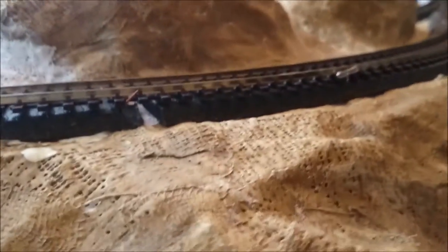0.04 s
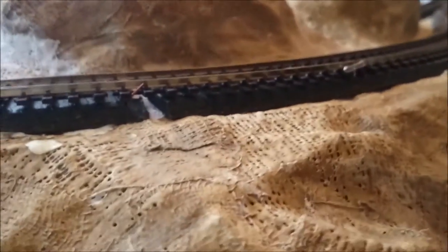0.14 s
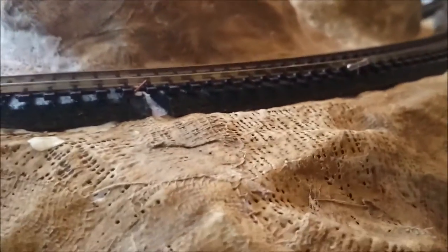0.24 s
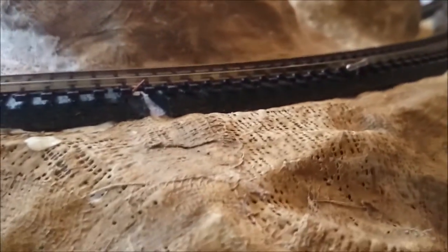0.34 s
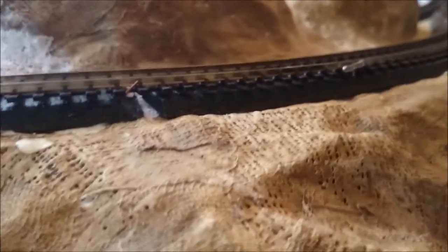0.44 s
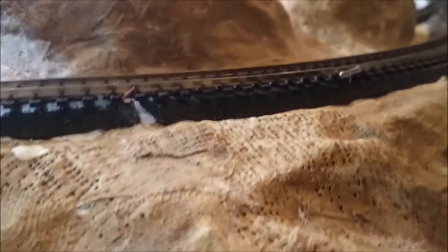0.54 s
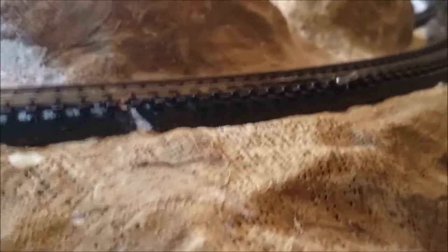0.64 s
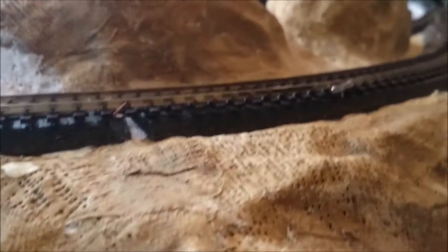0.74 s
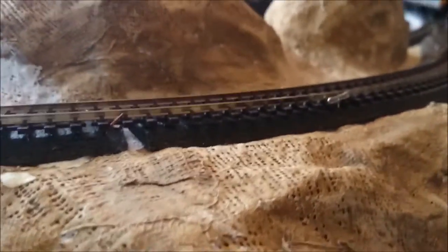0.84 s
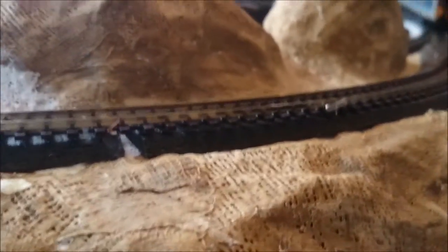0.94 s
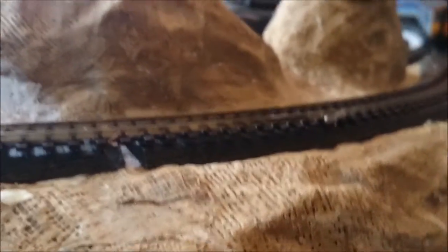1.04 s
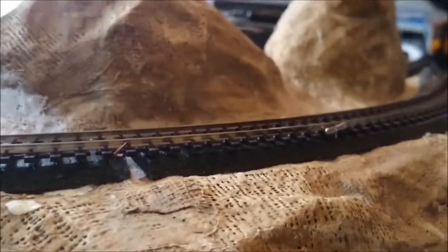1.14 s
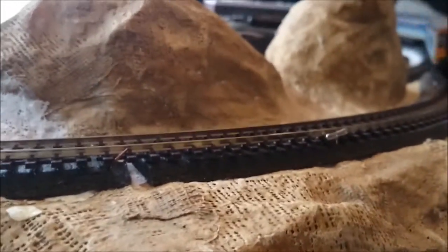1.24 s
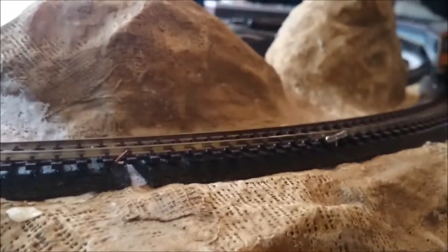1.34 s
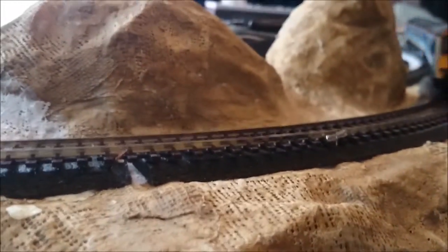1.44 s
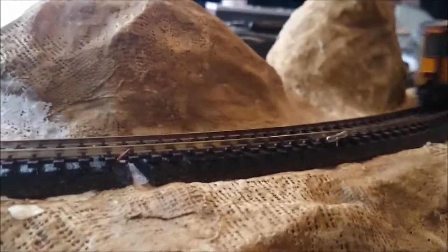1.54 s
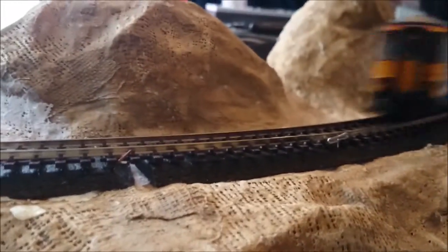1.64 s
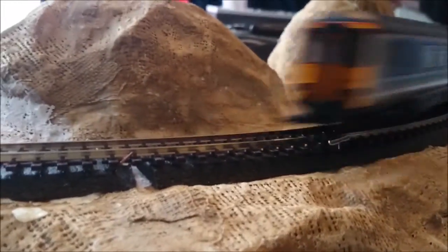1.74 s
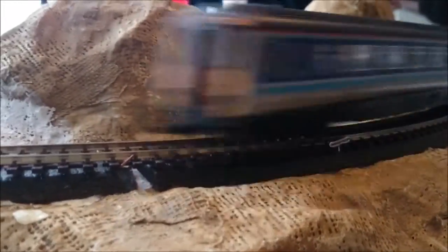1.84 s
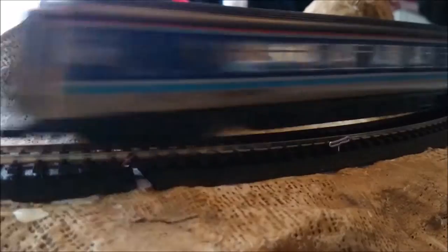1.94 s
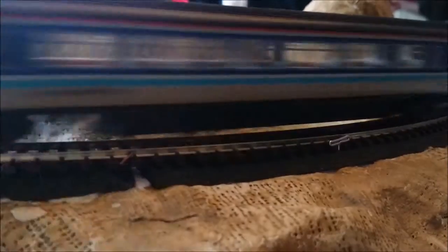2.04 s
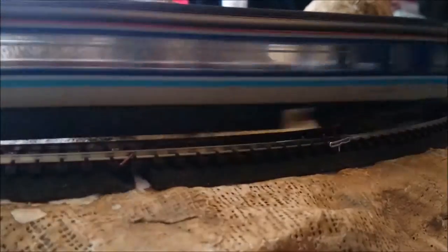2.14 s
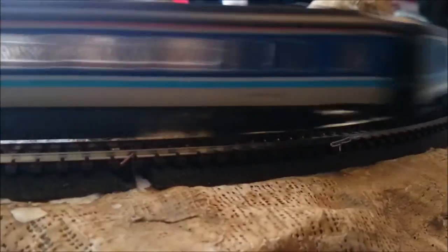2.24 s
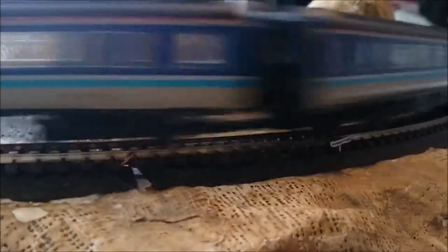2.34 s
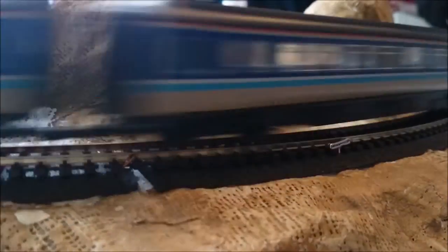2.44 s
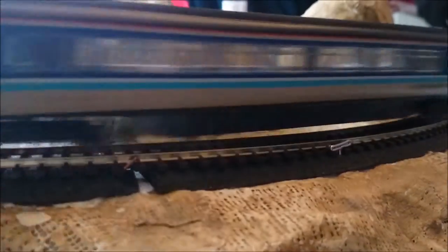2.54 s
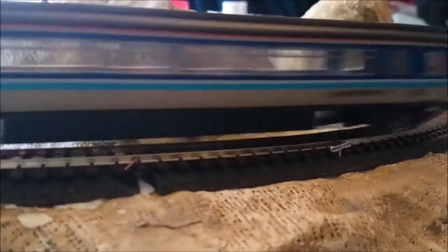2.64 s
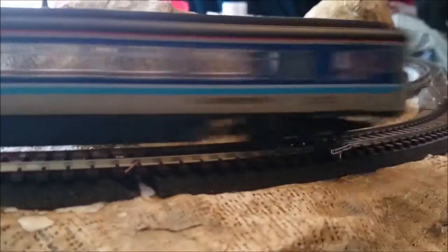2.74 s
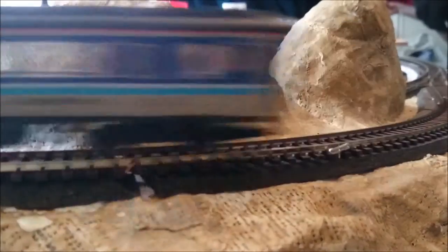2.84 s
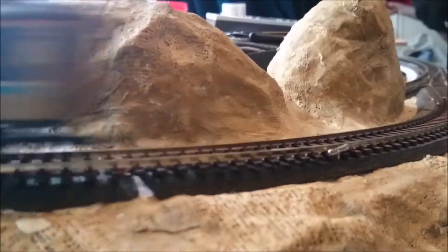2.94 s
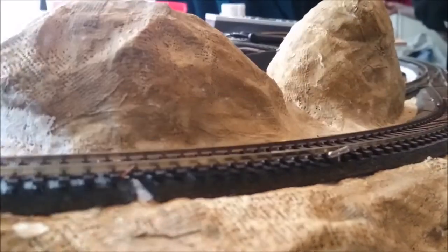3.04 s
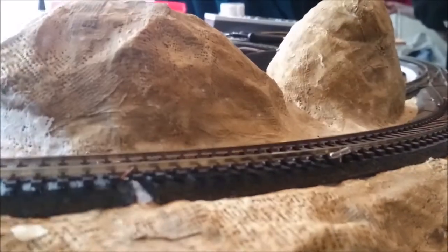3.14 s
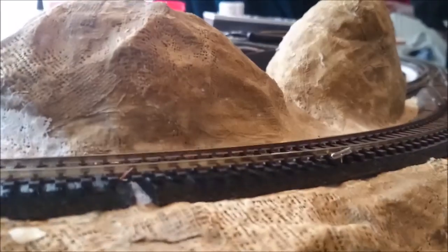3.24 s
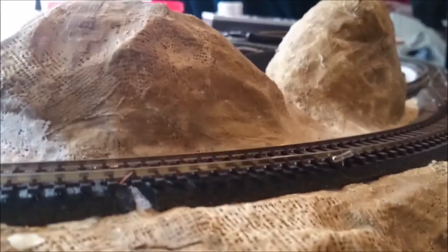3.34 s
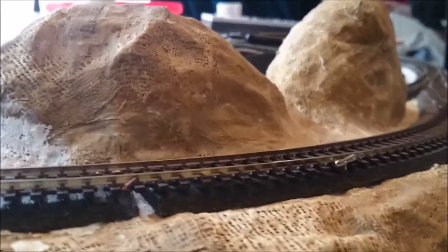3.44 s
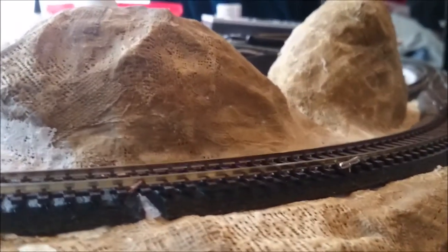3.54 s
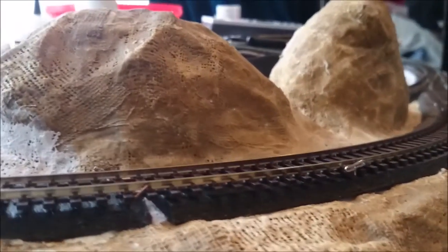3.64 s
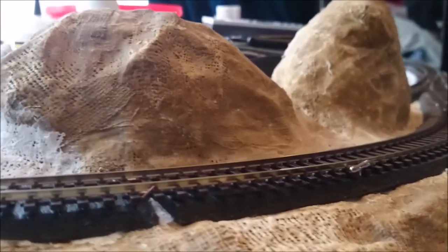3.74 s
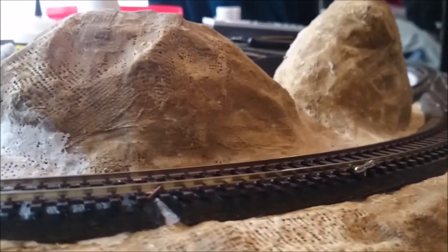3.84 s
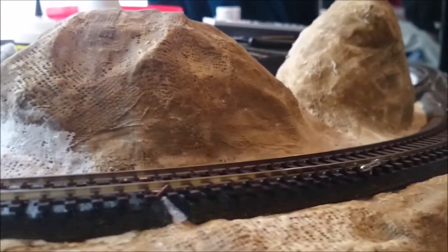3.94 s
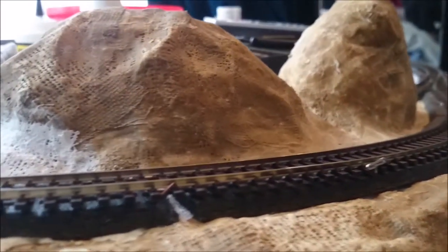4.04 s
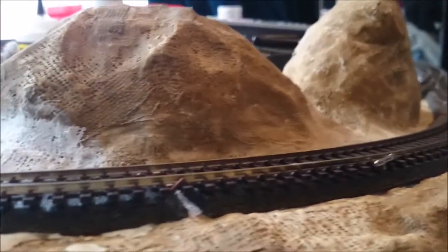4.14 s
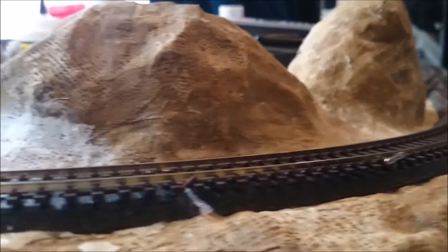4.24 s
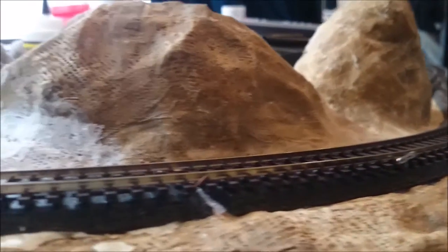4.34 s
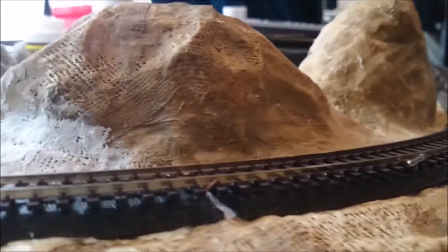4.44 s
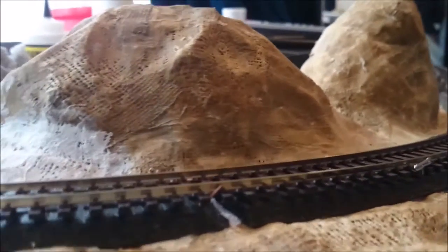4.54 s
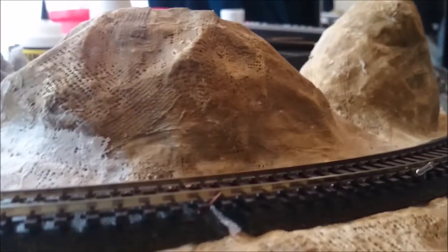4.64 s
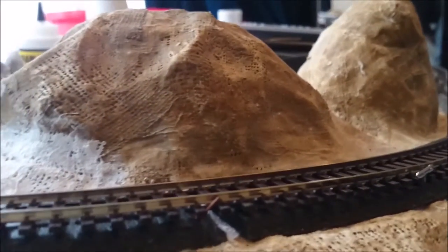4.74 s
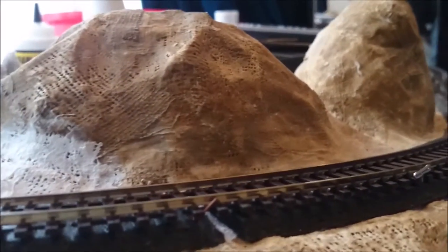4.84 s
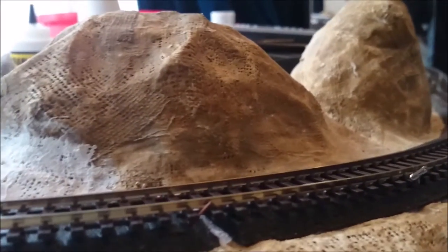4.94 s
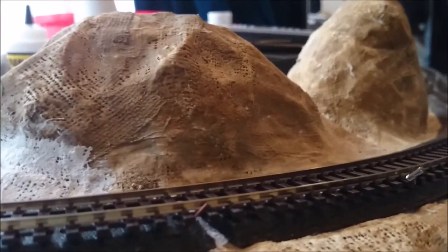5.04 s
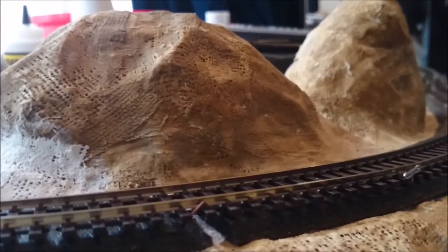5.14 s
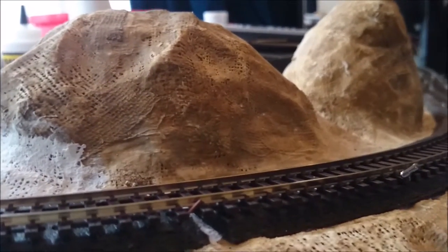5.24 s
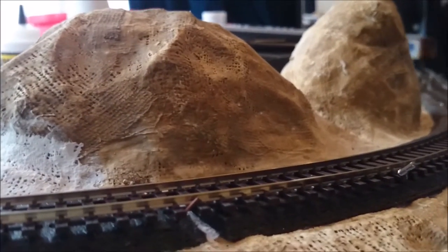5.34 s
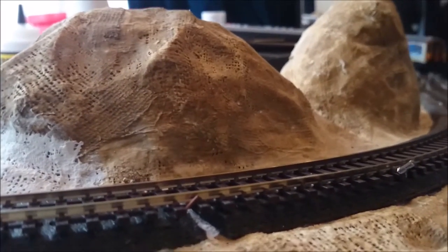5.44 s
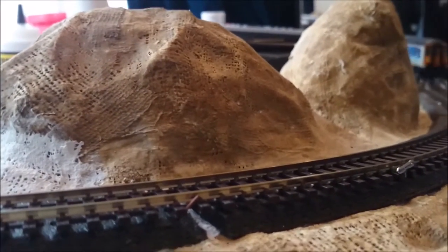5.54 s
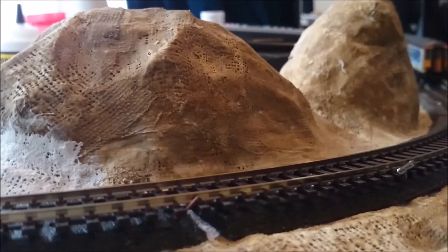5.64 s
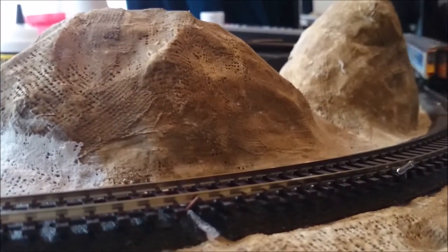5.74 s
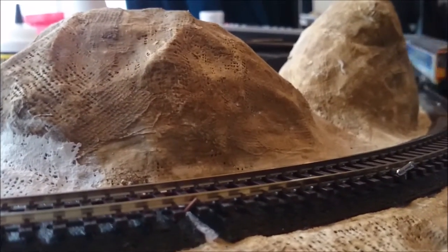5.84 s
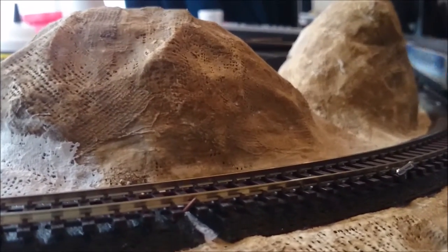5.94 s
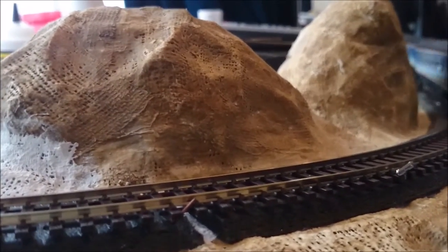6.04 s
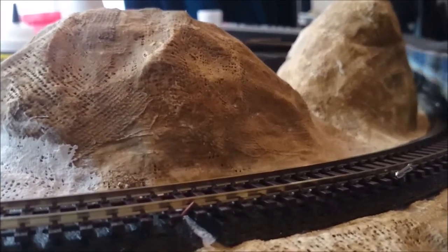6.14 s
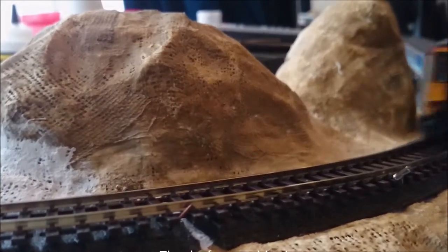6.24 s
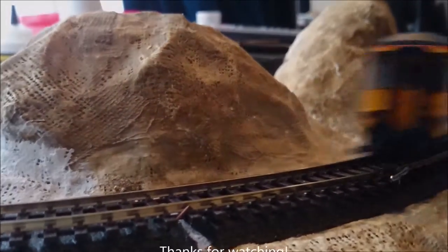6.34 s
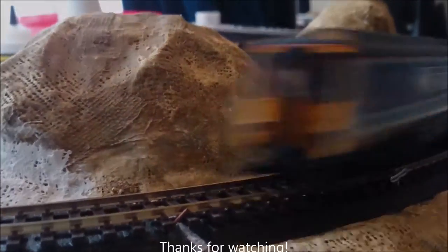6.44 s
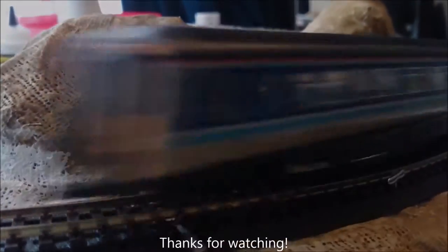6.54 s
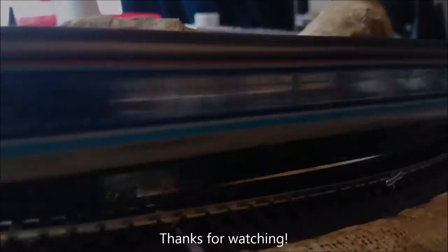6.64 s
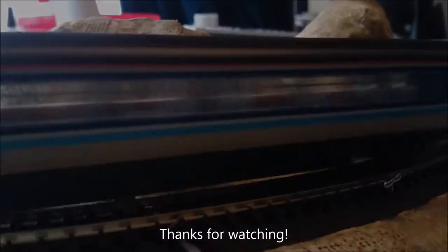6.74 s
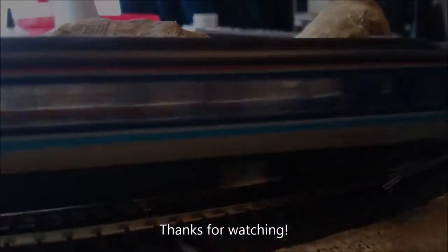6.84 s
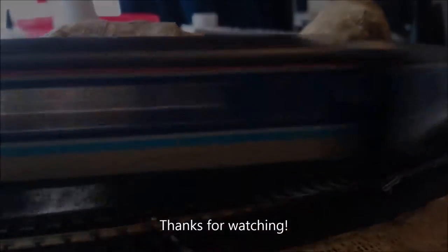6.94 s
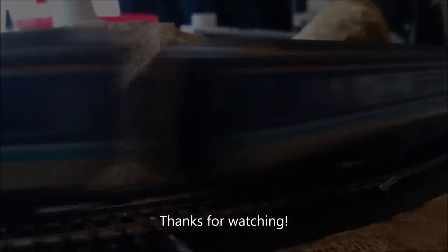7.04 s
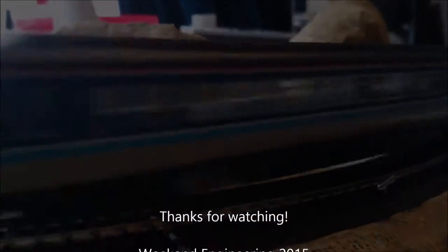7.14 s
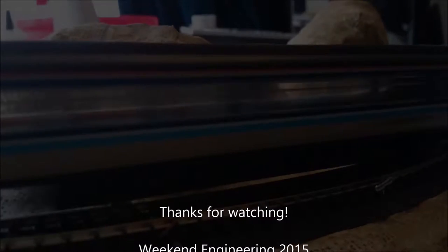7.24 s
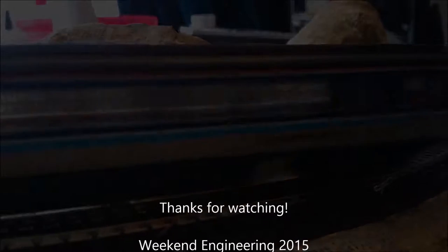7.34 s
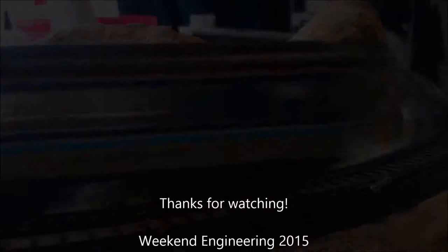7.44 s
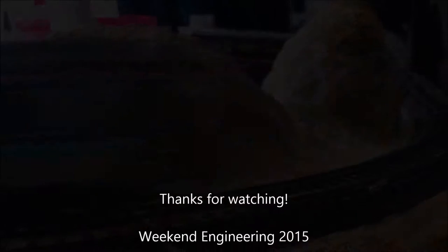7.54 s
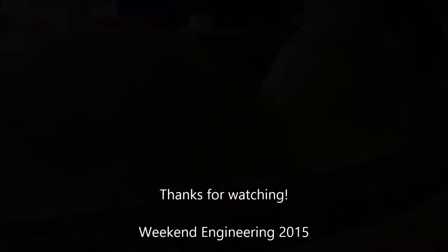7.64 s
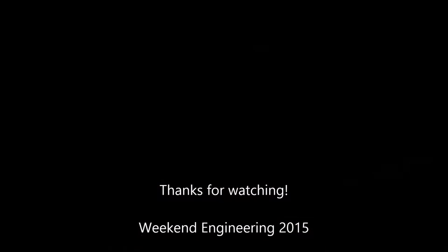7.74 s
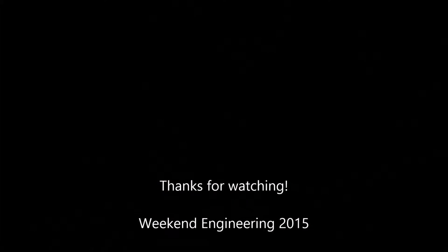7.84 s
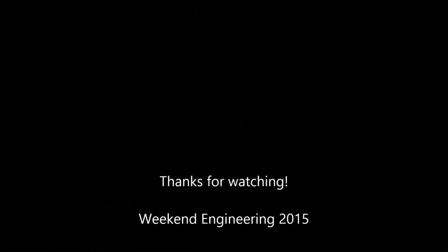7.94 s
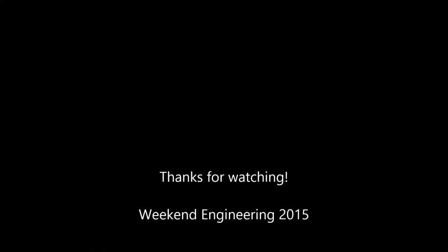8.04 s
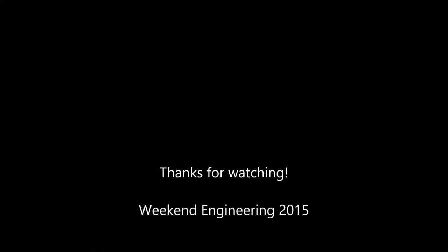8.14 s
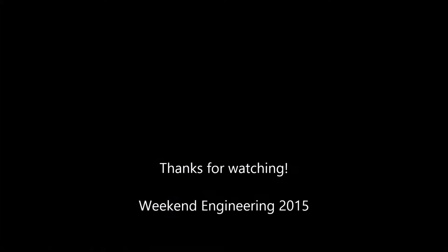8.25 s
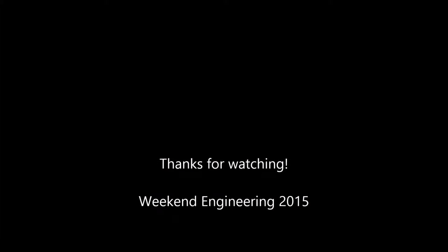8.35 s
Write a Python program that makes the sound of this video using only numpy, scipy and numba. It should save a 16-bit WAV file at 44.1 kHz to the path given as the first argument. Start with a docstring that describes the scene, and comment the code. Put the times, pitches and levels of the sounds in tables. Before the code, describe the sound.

Small metal wheels hiss and clatter over a hollow board as a whirring model train makes two close passes, then cuts off.

```python
"""Model train on a hollow board

A model train laps an oval and twice passes a hand's width from the microphone. Its gears rasp and whine,
its motor hums, and its wheels rattle the board, ring, hiss and tick over rail joints. Bends slow the
motor, distance and hills set the loudness, and each stretch of board rings at its own pitch. Loose track
slaps the board and the room rumbles softly. The sound stops dead about a second after the second pass."""
import sys
import numpy as np
from scipy import signal
from scipy.fft import rfft, irfft, next_fast_len
from scipy.io import wavfile
from scipy.ndimage import uniform_filter1d, map_coordinates
from numba import njit

SR = 44100
rng = np.random.default_rng(int(sys.argv[2]) if len(sys.argv) > 2 else 0)


def wrap_up_sound(samples):
    """Save the sound to the file named by the first command line argument, as 16-bit audio."""
    columns = np.atleast_2d(samples).T
    # keep every value between -1 and 1, then stretch to whole-number steps
    tamed = np.clip(columns, -1, 1)
    steps = np.round(tamed * 32767).astype(np.int16)
    wavfile.write(sys.argv[1], SR, steps)


N = 369545
LAP_S = 4.63
TIME = np.arange(N) / SR
SIZE = next_fast_len(N, real=True)
FREQ = np.maximum(np.arange(SIZE // 2 + 1) * SR / SIZE, 1)

# Tables marked "each lap" give their times on the first lap. A mode is a pitch at which a thing rings.
# how alike the left and right channels are: f/Hz, likeness/0-1
STEREO_LIKENESS = [(100, 0.28), (330, 0.64), (500, 1), (680, 0.33), (1100, 0.24), (1450, 0.057),
                   (2100, 0.46), (3000, 0.17), (8000, 0.082)]
# hills that hide the train, each lap: going in t/s, coming out t/s, shade/0-1
HILLS = [(3.875, 5.13, 0.99), (0.49, 1.036, 0.73), (0.93, 1.6, 0.44)]
# bends drag on the wheels and slow the gears, each lap: t/s, half length/s, tooth rate lost/Hz
BENDS = [(1.683, .38, 65), (2.598, .7, 68), (4.102, .3, 15)]
# modes of the chassis, the train's frame: f/Hz, width/Hz, level/dB
CHASSIS_MODES = [(4465, 370, -6), (4650, 400, -4), (4932, 320, -2.5), (5126, 340, -5), (5380, 520, -4.5),
                 (5620, 690, -10.5)]
# a bogie (wheel set) sweeps by: t/s, half length/s, rasp gain/dB, upper mode gain/dB, pitch shift/share
BOGIE_PASSES = [(1.855, 0.18, 8.5, -7, -0.019), (2.133, 0.1, 10.5, -3.5, 0.0048),
                (6.543, 0.12, 10.5, -10, .018), (6.758, 0.11, 10, -3.5, 0.0011)]
# how much louder the rolling and the board are on the left: f/Hz, left minus right/dB
STEREO_BALANCE = [(100, 2.77), (320, 3.92), (480, 7.85), (600, 11.63), (800, 7.8), (1000, 7.92),
                  (1400, 4.88), (2000, 8.94), (2800, 10.98), (3600, 8.94), (5000, 8.94), (7000, 2.82)]
# tone of the rolling wheels: f/Hz, level/dB
ROLL_TONE = [(60, -27.5), (170, -19), (230, -10.5), (300, -2.5), (500, -1), (800, -2.5), (1020, 3.5),
             (1280, -0.5), (1650, 0.5), (2000, 1), (2300, 1.5), (2650, -1.5), (3500, -1.5), (4600, -3.5),
             (8000, -52)]
# modes of the hollow board: f/Hz, width/Hz, level/dB
BOARD_MODES = [(288, 110, -4), (393, 150, -1), (456, 100, -16.5), (593, 93, 8.5), (675, 270, 4),
               (792, 160, 2)]
# the track lifts clear and rattles the board less, each lap: t/s, half length/s, gain/dB
LIFTED_TRACK = [(1.853, 0.16, -1.5), (2.707, 0.089, -9), (3.141, 0.13, -3.5)]
# modes of the wheels and axles: f/Hz, width/Hz, level/dB
WHEEL_MODES = [(1025, 110, 0), (1466, 98, -1), (1691, 130, -3), (1998, 120, -0.5), (2615, 120, -2.5),
               (3050, 150, -1), (3830, 150, -4.5), (4530, 170, -11), (5050, 160, -4.5), (5495, 110, -1)]
# tone of the hiss on the rails: f/Hz, level/dB
HISS_TONE = [(2500, -29.5), (4000, -1), (5200, -5), (6100, 4), (6800, -5), (7800, -8.5), (9000, -16),
             (12000, -60.5)]
# tone of the finer sizzle above it: f/Hz, level/dB
SIZZLE_TONE = [(4000, -9), (7000, 10.5), (8300, -2), (9500, -1), (11500, -3), (13300, -4.5), (15500, -18)]
# places where the wheels hiss more or less, each lap: t/s, half length/s, sizzle gain/dB
HISS_SPOTS = [(1.64, .12, 2.5), (2.57, .1, 1.5), (2.87, .13, -2), (4.14, .1, 3.5)]
# pitches weakened while the train is on the far side: f/Hz, width/Hz, depth/0-1
FAR_DIPS = [(2300, 460, 0.6), (3580, 430, .25)]
# echoes off the scenery, each lap: shortest delay/ms, growth/ms, shortest at t/s, level/dB
ECHOES = [(1.6, .9, 2.07, -25), (4.3, 0.91, 1.1, -33), (7.7, 1.5, 3.2, -17), (12.4, 1.3, 0.25, -24.5)]
# the motor drums through firmly laid track, each lap: t/s, half length/s, whine gain/dB, hum gain/dB
FIRM_TRACK = [(0.495, 0.24, -1.5, 1), (.97, 0.11, 2.5, 2), (1.805, 0.07, 10.5, 10.5),
              (2.017, 0.084, 13.5, 9), (3.08, 0.11, 10, 11), (3.58, 0.2, 7, 18.5), (4.056, 0.23, -1.5, 12)]
# tone of the room: f/Hz, level/dB
ROOM_TONE = [(15, -7), (32, -13.5), (49, -0.5), (70, -12.5), (110, -5), (300, -25), (2000, -42)]
# tone of the hand's rumble on the microphone: f/Hz, level/dB
HAND_TONE = [(2, -8), (7, 0), (14, -3), (25, -22), (60, -42), (300, -80)]
# the hand shifts its grip: t/s, half length/s, gain/dB
GRIPS = [(0.246, 0.45, 10), (7.59, 0.282, 26)]
# ringing stretches of board and track, and the chassis ringing as the train nears (the 5110 and 4620 Hz rows),
# each lap: t/s, half length/s, f/Hz, glide/(Hz/s), width/Hz, level/dB
HOLLOWS = [(0.155, 0.11, 3050, 0, 440, -47.5), (0.482, 0.36, 3080, -100, 460, -50.5),
           (0.546, .3, 2790, 0, 358, -49), (.6, 0.69, 1028, 0, 378, -53),
           (0.773, 0.16, 568, 0, 49.4, -48.5), (1.294, 0.69, 6480, -1, 649, -48.5),
           (1.27, 0.19, 5110, -200, 260, -38.5), (1.28, 0.23, 4620, 0, 250, -44),
           (1.4, 0.16, 3000, 299, 320, -48), (1.47, 0.11, 587, 250, 85, -40.5),
           (1.69, 0.18, 416, -400, 132, -42.5), (1.799, 0.069, 2010, -900, 241, -41.5),
           (1.98, 0.14, 6100, 899.5, 300, -39.5), (2.11, 0.14, 668, -300, 75, -40.5),
           (2.17, 0.1, 6800, -0.5, 898, -41.5), (2.301, 1.1, 2400, -0.5, 261.4, -53),
           (2.33, 0.14, 602, -0.5, 45.6, -43.5), (2.52, .1, 910, -1.5, 129, -38),
           (2.585, 0.07, 611, -0.5, 36, -38.5), (2.6, 0.89, 271, 1, 50.4, -53.5),
           (2.95, 0.47, 4050, -200, 420, -43), (2.9, .1, 5150, 2600, 260, -40),
           (2.914, 0.054, 605, 0.5, 55, -43.5), (2.917, 0.046, 1000, 0, 140, -40),
           (3.02, .13, 1734, -200, 74.6, -42.5), (3.203, 0.27, 2030, -700, 140, -46),
           (3.398, 0.14, 1726, 0.5, 90, -46.5), (3.5, 0.069, 5290, 0, 160, -50),
           (3.65, 0.58, 675, 0.5, 140, -43), (3.9, 0.19, 1300, 1.5, 130, -48),
           (4, 0.45, 5680, 1.5, 336, -47.5), (4.298, 0.4, 824, 1, 450, -42),
           (4.35, 0.16, 1730, 0, 121, -52), (4.5, 0.1, 2540, 0, 170.6, -48.5)]
# wheels hit rail joints: t/s, relative level/dB
JOINTS = [(1.0621, -33.5), (1.616, -29.5), (1.651, -25), (3.243, -22), (3.2923, -26.5), (3.336, -36),
          (3.389, -27), (3.4435, -28.5), (3.6533, -40), (3.699, -26), (3.7452, -29), (5.7088, -38),
          (6.219, -26.5), (6.401, -30)]
# tone of a joint's tick: f/Hz, level/dB
TICK_TONE = [(300, -10.5), (1000, 11), (3000, 13), (5300, 11), (8000, 6.5), (10000, -5), (14000, -6),
             (16000, -21.5)]
# loose track slaps the board: t/s, level/dB, f/Hz
SLAPS = [(2.252, -31, 626), (3.244, -32, 700), (3.481, -29, 636), (3.497, -39, 710), (3.536, -35, 606),
         (3.653, -30, 690), (3.711, -31.5, 620), (3.805, -30.5, 665), (3.938, -34.5, 565),
         (3.982, -31, 670), (4.233, -38, 696), (4.261, -37, 720), (4.279, -36, 804), (4.307, -38, 620),
         (6.084, -30, 616), (6.788, -27.5, 707)]
# tone of the clatter on short rails: f/Hz, level/dB
CLATTER_TONE = [(1000, -2), (5500, 4), (8200, -13), (10000, -3), (15000, -15)]


def undb(db):
    """Turns decibels into a factor to multiply by."""
    return 10 ** (np.asarray(db) / 20)


def across(points):
    """Joins (Hz, value) points into a curve over all pitches."""
    hz, value = np.transpose(points)
    return np.interp(np.log(FREQ), np.log(hz), value)


def resonances(modes):
    """How strongly a body with these modes answers at each pitch."""
    gains = (undb(db) / (1 + ((FREQ - hz * hz / FREQ) / width) ** 2) for hz, width, db in modes)
    return np.sqrt(sum(gain ** 2 for gain in gains))


def wander(per_s):
    """A smooth random wobble, about 1 in size, with per_s new values a second."""
    hold = int(SR / per_s)
    steps = np.repeat(rng.standard_normal(N)[:N // hold + 1], hold)
    return 1.45 * uniform_filter1d(uniform_filter1d(steps, hold), hold)[:N]


def contacts(per_s, scatter_db):
    """Two streams of tiny, uneven hits: one heard directly, one scattered by the scenery."""
    hit = rng.random((2, N)) < per_s / SR
    direction = np.sign(rng.standard_normal((2, N)))
    return hit * direction * undb(scatter_db * np.clip(rng.standard_normal((2, N)), -2, 2))


def stereo(push, tone, left_db=0):
    """Gives two streams one tone, at a standard level; the right channel gets a late blend of both."""
    direct, scattered = rfft(push, SIZE)
    alike = np.clip(across(STEREO_LIKENESS), 0, 1)
    lag_s = 0.00033
    right = alike * direct * np.exp(-2j * np.pi * FREQ * lag_s) + np.sqrt(1 - alike ** 2) * scattered
    pair = irfft(np.array([direct, right * undb(-left_db)]) * tone, SIZE)[:, :N]
    return pair / pair.mean(axis=0).std()


def pan(pair, left_db):
    """Leans a sound to the left by left_db."""
    gains = undb(np.array([left_db, -left_db]) / 2).reshape(2, -1)
    return pair * gains / np.sqrt(np.mean(gains ** 2, axis=0))


@njit
def band(x, hz, width_hz):
    """A filter that lets through only the pitches near hz, which may move."""
    out, band_state, low_state = np.empty(len(x)), 0., 0.
    for i in range(len(x)):
        step, damping = np.tan(np.pi * hz[i] / SR), width_hz / hz[i]
        swing = (band_state + step * (x[i] + 1e-18 - low_state)) / (1 + step * (step + damping))
        band_state = 2 * swing - band_state
        low_state += 2 * step * swing
        out[i] = damping * swing
    return out


def ringing(push, hz, width_hz):
    """One mode ringing in both channels, at a standard level."""
    pair = np.array([band(band(side, hz, float(width_hz)), hz, float(width_hz)) for side in push])
    return pair / pair.std()


def delayed(x, lag_s):
    """The same sound lag_s later; the lag may change."""
    return map_coordinates(x, [(TIME - lag_s) * SR], order=2)


def swell(s, half_s):
    """One smooth rise and fall, 0-1, around time s."""
    return np.exp(-((TIME - s) / half_s) ** 2)


def time_past(s):
    """Seconds past the place the train reaches at time s; negative on the way there."""
    return (TIME - s + LAP_S / 2) % LAP_S - LAP_S / 2


def spot(s, half_s):
    """A swell, 0-1, that returns on every lap."""
    return np.exp(-(time_past(s) / half_s) ** 2)


def spots(table):
    """Adds up a table of swells that return on every lap."""
    return sum(size * spot(s, half_s) for s, half_s, size in table)


def stretch(from_s, to_s, edge_s=0.027):
    """1 while the train is on this part of the lap, else 0, with soft edges."""
    inside_s = (to_s - from_s) / 2 - np.abs(time_past((from_s + to_s) / 2))
    return 0.5 + 0.5 * np.tanh(inside_s / edge_s)


def lap_level(nearest_s, gap, base_db, hill_db):
    """Level in dB as distance and hills dim a sound; gap is the least distance, in widths of the oval."""
    distance = np.hypot(gap, np.sin(np.pi * time_past(nearest_s) / LAP_S))
    lost_db = 5 * np.log2(distance / gap)  # the room keeps it under 6 dB per doubling
    closer_db = 1.08 * TIME / LAP_S  # the second pass is a little closer
    shade = sum(depth * stretch(from_s, to_s) for from_s, to_s, depth in HILLS)
    return base_db + closer_db - lost_db + hill_db * shade


def gear_phase(straight_hz=368):
    """The gears turn, one cycle for each tooth that meets; bends slow them down."""
    return 2 * np.pi * np.cumsum(straight_hz - spots(BENDS)) / SR


def chassis_ring(pitch_shift, upper_db, drift=0.012, swell_db=1.4):
    """Scraping gears ring the chassis; each mode drifts and swells by itself as the car rocks."""
    out, power = 0, 0
    for k, (hz, width_hz, db) in enumerate(CHASSIS_MODES):
        gain = undb(db + upper_db * (k >= 3))
        ring = ringing(rng.standard_normal((2, N)), hz * (1 + pitch_shift + drift * wander(7)), width_hz)
        out += ring * gain * undb(swell_db * np.tanh(wander(14)))
        power += gain ** 2
    roughness = undb(0.73 * wander(110) + 1.06 * wander(32))
    return out / np.sqrt(power) * roughness


def gear_rasp(tooth_phase, left_db, rise_per_s=0.33):
    """The gears' rasp flares and climbs in pitch as each bogie goes by, while its top modes are shaded."""
    rasp_db = lap_level(nearest_s=2.15, gap=0.4, base_db=-34, hill_db=-4.5)
    pitch_shift, upper_db = 0, 0.5
    for s, half_s, flare_db, bright_db, shift in BOGIE_PASSES:
        passing = swell(s, half_s)
        rasp_db += flare_db * passing
        upper_db += bright_db * passing
        pitch_shift += passing * (shift + rise_per_s * (TIME - s))
    tooth_beat = 1 + 0.34 * spot(1.3, 0.33) * np.cos(tooth_phase)  # comes through as the train nears
    return pan(chassis_ring(pitch_shift, upper_db) * tooth_beat * undb(rasp_db), left_db)


def rolling(roll_db):
    """Wheels jolt over rough rail: a broad rolling noise, with the board rattling under it."""
    left_db = across(STEREO_BALANCE)
    board_db = lap_level(nearest_s=2.94, gap=0.6, base_db=-43, hill_db=-3.5) + spots(LIFTED_TRACK)
    jolt = undb(1.39 * wander(55))
    roll = stereo(contacts(per_s=9000, scatter_db=2) * jolt, undb(across(ROLL_TONE)), left_db)
    board = stereo(contacts(per_s=710, scatter_db=3) * jolt, resonances(BOARD_MODES), left_db)
    return roll * undb(roll_db) + board * undb(board_db)


def wheel_ring(level_db, drift=0.027, swell_db=3):
    """Metal wheels sing in narrow modes that come and go as the rail touches different parts of them."""
    scrape, out = rng.standard_normal((2, N)), 0
    for hz, width_hz, db in WHEEL_MODES:
        ring = ringing(scrape, hz * (1 + drift * wander(4)), width_hz)
        out += ring * undb(db + swell_db * np.tanh(wander(8)))
    return pan(out * undb(level_db), left_db=8.5)


def rail_hiss(left_db):
    """Metal wheels hiss on the rails; the finest sizzle travels straight, so hills dim it most."""
    sizzle_db = lap_level(nearest_s=2.06, gap=0.12, base_db=-42.5, hill_db=-8.5) + spots(HISS_SPOTS)
    hiss_db = 0.63 * (sizzle_db - 7) - 7  # also arrives by way of the room, so it swells less
    chatter = undb(1.2 * wander(50))
    hiss = stereo(contacts(per_s=8000, scatter_db=2.5) * chatter, undb(across(HISS_TONE)))
    sizzle = stereo(contacts(per_s=3800, scatter_db=2.5) * chatter, undb(across(SIZZLE_TONE)))
    return pan(hiss * undb(hiss_db) + sizzle * undb(sizzle_db), left_db)


def far_side(pair):
    """Far away the train sounds hollow: sound bouncing off the board partly cancels the direct sound."""
    far = spot(0.37, 0.7)
    for hz, width_hz, depth in FAR_DIPS:
        cancelled = np.array([band(side, np.full(N, float(hz)), float(width_hz)) for side in pair])
        pair = pair - depth * far * cancelled
    return pair


def scenery_echoes(pair):
    """Hills and walls return the sound; the paths change round the lap, so the tone keeps shifting."""
    out, power = pair, 1
    for least_ms, growth_ms, nearest_s, db in ECHOES:
        lag_ms = least_ms + growth_ms * np.sin(np.pi * (TIME - nearest_s) / LAP_S) ** 2
        out = out + undb(db) * np.array([delayed(side, lag_ms / 1000) for side in pair])
        power += undb(db) ** 2
    return out / np.sqrt(power)


def motor(tooth_phase, whine_db=-59 + 5, hum_db=-70):
    """The shaft hums and the gears whine at two and a half times its rate; both flutter with the load."""
    for s, half_s, more_whine_db, more_hum_db in FIRM_TRACK:
        whine_db += more_whine_db * spot(s, half_s)
        hum_db += more_hum_db * spot(s, half_s)
    hum = np.sin(tooth_phase / 2.5 + 0.6 * wander(22)) * undb(hum_db + 4 * np.tanh(wander(16)))
    whine = np.sin(tooth_phase + 1.41 * wander(35)) * undb(whine_db + 2.9 * wander(25))
    return pan(hum, left_db=6) + pan(whine, left_db=3.5)


def room_and_hand(room_db=-72, hand_db=-66.5):
    """Low, uneven room noise, and the rumble of the hand that holds the microphone."""
    room = stereo(rng.standard_normal((2, N)), undb(across(ROOM_TONE))) * undb(room_db + 3.3 * wander(19))
    grip_db = sum(db * swell(s, half_s) for s, half_s, db in GRIPS)
    hand = stereo(rng.standard_normal((2, N)), undb(across(HAND_TONE))) * undb(hand_db + grip_db)
    return room + pan(hand, left_db=-4)


def hollows(chatter_db=3.5):
    """Each stretch of board is shaken and rings at its own pitch, which can slide as the train moves; the
    chassis rings the same way as the train nears."""
    shake = rng.standard_normal((2, N)) * undb(chatter_db * wander(70))
    out = np.zeros((2, N))
    for s, half_s, hz, glide_hz_per_s, width_hz, db in HOLLOWS:
        past_s = time_past(s)
        near = np.abs(past_s) < 2 * half_s
        ring = ringing(shake[:, near], hz + glide_hz_per_s * past_s[near], width_hz)
        out[:, near] += ring * undb(db) * spot(s, half_s)[near]
    return pan(out, left_db=10.5)


def joint_ticks(gain_db=-10, ring_db=-5.5, decay_s=0.014):
    """A wheel drops into a rail gap: a bright tick with a short rattle that also rings the chassis."""
    blows, age = np.zeros(N), TIME[:SR // 5]
    for s, db in JOINTS:
        start = int(s * SR)
        blows[start:start + len(age)] += undb(db + gain_db) * np.exp(-age / decay_s)
    rattle = contacts(per_s=9000, scatter_db=2)
    tick = pan(stereo(rattle, undb(across(TICK_TONE))), left_db=8.5)
    ring = pan(stereo(rattle, resonances(CHASSIS_MODES)) * undb(ring_db), left_db=11.5)
    return (tick + ring) * blows


def track_slaps(decay_s=0.0022):
    """Loose track slaps the board, which answers with one short, hollow note."""
    out, age = np.zeros(N), TIME[:SR // 20]
    rise_and_fall = age / decay_s * np.exp(1 - age / decay_s)
    for s, db, hz in SLAPS:
        start = int(s * SR)
        out[start:start + len(age)] += undb(db) * rise_and_fall * np.sin(2 * np.pi * hz * age)
    return pan(out, left_db=9)


def clatter(level_db=-52):
    """Wheels chatter lightly over a run of short rails."""
    ticks = stereo(contacts(per_s=1500, scatter_db=4), undb(across(CLATTER_TONE)))
    return pan(ticks, left_db=7) * undb(level_db) * spot(3.45, 0.384)


def scene():
    """The train runs round its oval in a quiet room."""
    tooth_phase = gear_phase()
    on_left, on_right = stretch(1.8, 4.0), stretch(0.98, 1.85)
    lean_db = 10.5 + 10 * on_left
    # the rolling peaks broadly, a little after the gears
    wheels_db = lap_level(nearest_s=2.38, gap=0.68, base_db=-41.5, hill_db=-1.5)
    running = gear_rasp(tooth_phase, left_db=lean_db + 15)
    running += rolling(wheels_db + 1.02) + wheel_ring(wheels_db - 10)
    running += rail_hiss(left_db=0.68 * lean_db - 7.5)
    left, right = scenery_echoes(far_side(running))
    right = delayed(right, lag_s=-0.0004 * on_right)  # arrives sooner when the train is on that side
    train = np.array([left, right]) + motor(tooth_phase)
    return train + hollows() + joint_ticks() + track_slaps() + clatter() + room_and_hand()


def record(dry, stop_s=7.786, top_hz=15450):
    """Stops the sound dead and takes away the very highest pitches."""
    gate = np.clip((stop_s - TIME) / 0.005 + 0.5, 0, 1)
    low_pass = signal.ellip(10, 0.2, 80, top_hz, fs=SR, output="sos")
    return signal.sosfilt(low_pass, dry * gate)


dry = scene()
out = record(dry)
wrap_up_sound(out)
```